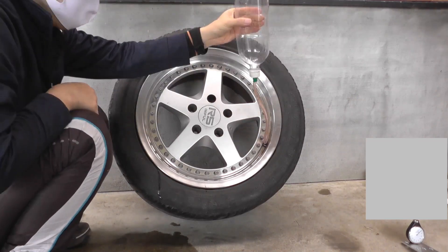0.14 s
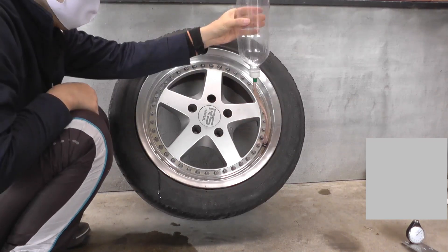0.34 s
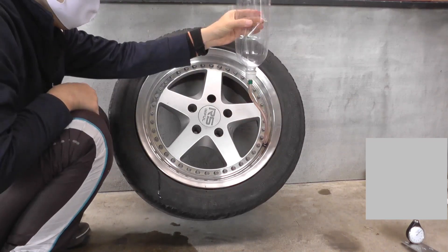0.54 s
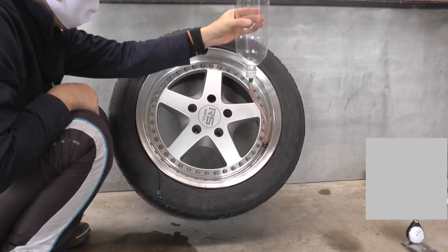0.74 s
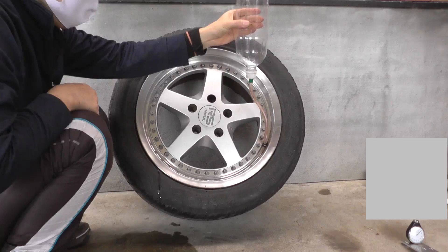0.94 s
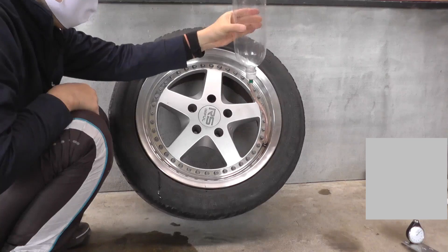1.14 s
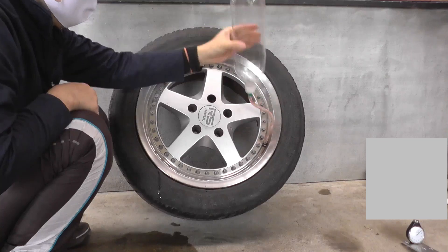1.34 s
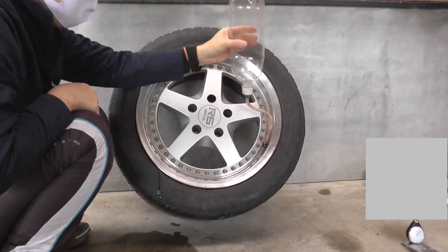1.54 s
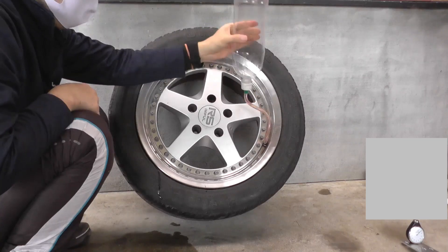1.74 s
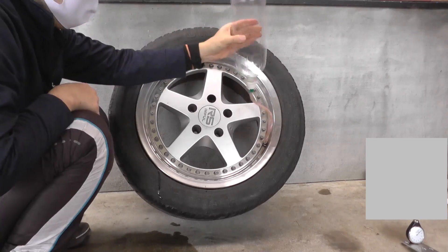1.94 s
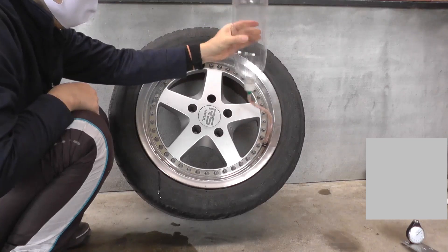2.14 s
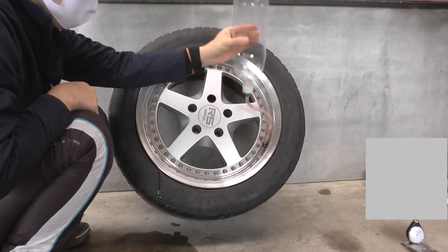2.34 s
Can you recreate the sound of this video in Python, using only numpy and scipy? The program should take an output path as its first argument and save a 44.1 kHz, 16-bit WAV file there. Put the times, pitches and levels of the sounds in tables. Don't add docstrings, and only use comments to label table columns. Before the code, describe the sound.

A thin plastic bottle drains through a hose, its dented wall popping sharply. After a brief silence until 0.14 s, dull gulps lead to a loud snap at 0.27 s and a softer, brighter one at 0.57. Quiet follows, with faint rustles and ticks from 1.15. Hollow gulps and snaps return at 1.55, 1.88 and 2.12, then a weak dull one at 2.33. Short garage echo, distant rumble, faint hiss.

```python
import sys
import numpy as np
from scipy import signal
from scipy.fft import rfft, irfft, next_fast_len
from scipy.io import wavfile
from scipy.ndimage import uniform_filter1d

SR = 44100
rng = np.random.default_rng(int(sys.argv[2]) if len(sys.argv) > 2 else 0)


def unload_audio(sound):
    columns = np.transpose(np.atleast_2d(sound))
    steps = np.round(np.clip(columns, -1, 1) * 32767)
    wavfile.write(sys.argv[1], SR, steps.astype(np.int16))


def gain_from_db(level_db):
    decades = np.asarray(level_db, float) / 20
    return 10 ** decades


N = 105840

# frequency in Hz, level in dB.
RUMBLE_SPECTRUM = [(25, -34), (45, -5), (60, 1), (150, 3), (300, 1.5), (550, -2.5), (1200, -8),
                   (1800, -23.5), (3000, -34.5)]
# frequency in Hz, level in dB.
HISS_SPECTRUM = [(1500, 10.5), (2500, 10), (4000, -14), (7500, -0.5), (11000, -23), (15000, -27),
                 (15500, -55)]
# frequency in Hz, likeness from 0 to 1.
PORT_LIKENESS = [(60, 0.98), (180, 1), (550, 0.95), (1650, 0.9), (4970, 0.87), (15000, 0.83)]
# start in seconds, length in seconds, level in dB,
# tilt in dB per octave.
RUSTLES = [(0.124, 0.036, -60.5, -1.5), (0.201, 0.026, -53, -11), (0.422, 0.082, -63.5, -3),
           (0.737, 0.049, -65.5, 1), (1.154, 0.05, -56, -1.5), (1.248, 0.018, -54, -3),
           (1.307, 0.17, -63.5, -5), (1.386, 0.042, -57.5, 0), (1.428, 0.024, -56, 2),
           (1.507, 0.024, -53.5, -5), (1.587, 0.16, -65, -5), (1.683, 0.091, -58, 0.5),
           (1.817, 0.066, -55.5, -7), (1.904, .13, -57.5, -1.5), (2.056, 0.031, -57, -5.5),
           (2.137, 0.11, -56.5, -2), (2.271, 0.048, -54.5, -4), (2.369, .05, -53.5, -6)]
# frequency in Hz, level in dB.
RUSTLE_SPECTRUM = [(1500, 1), (3000, 2.5), (5000, 3.5), (7500, 9), (10500, 3), (13000, -2.5), (15500, -40),
                   (16000, -30)]
# start in seconds, peak in dB, tilt in dB per octave.
HOSE_TICKS = [(0.2178, -39.5, -8), (0.231, -38.5, -2), (0.3894, -48.5, -3), (0.554, -47.5, -5),
              (1.2488, -40.5, -6), (1.304, -37.5, -1), (1.385, -46, -5), (1.4087, -51, 3), (1.542, -46, 5),
              (1.865, -39, -2), (1.838, -47, -2), (1.871, -39, 3), (2.076, -46, -2), (2.103, -34.5, -1),
              (2.289, -49, -3), (2.3078, -39, -9), (2.3092, -40.5, 5), (2.326, -39, -6), (2.3844, -43, -3)]
# frequency in Hz, level in dB.
TICK_SPECTRUM = [(1500, -19), (3000, -14), (4500, -12), (6100, -5), (8000, -3), (11000, -13.5),
                 (15500, -23)]
# start in seconds, peak in dB, pitch in Hz, life in cycles,
# thump in dB.
BOTTLE_GULPS = [(0.23, -19, 744, 0.86, -4), (0.234, -14, 430, 1.94, -14), (0.2556, -5.5, 625, 1.35, -14.5),
                (0.4893, -15.5, 875, 2, -28), (0.494, -23, 498, 2.3, -30), (.555, -15.5, 620, 1, -13),
                (1.409, -26, 465, 4.3, -17), (1.409, -28, 850, 4.2, -23), (1.517, -28.5, 436, 11.5, 0),
                (1.54, -14, 680, 1.2, -8.5), (1.6958, -21, 1215, 2.5, -15), (1.699, -24.5, 870, 7.6, -40),
                (1.700, -19, 475, 1.96, -9), (1.838, -22.5, 660, 2.5, -3), (1.848, -13, 383, 1.7, -28),
                (1.8611, -17, 720, 3.8, -4.5), (1.916, -31, 880, 2.1, -28), (1.951, -23.5, 850, 3.3, -12),
                (2.0745, -26.5, 950, 3, -1), (2.075, -29, 520, 2, -1), (2.088, -23.5, 322, 6.2, -10),
                (2.096, -29, 370, 2.4, -20), (2.1005, -7.5, 576, 0.76, -15.5),
                (2.200, -22.5, 780, 3.3, -10), (2.107, -22, 404, 2.7, -20), (2.12, -21, 332, 2.4, -14),
                (1.841, -22.5, 285, 2.7, -18), (1.863, -17.5, 400, 2.8, -33), (1.882, -18, 281.7, 2, -11),
                (1.555, -21.5, 220, 2.4, -16), (0.27, -23, 232, 3.2, -25), (0.567, -24.5, 248, 4.2, -12)]
# start in seconds, peak in dB, brightness in dB per octave,
# shell level in dB, middle modes in dB.
WALL_SNAPS = [
    (0.268, -1, 0, -1.5, 0),
    (0.5657, -7.5, 0.5, 0.5, 2.5),
    (1.5524, -1.5, 0.16, -2.5, 0),
    (1.8815, -5, 0.4, -2.5, 2),
    (2.119, -6, 0, -2, 1.5),
    (2.3283, -21, -2.8, 1.5, -4),
]
# frequency in Hz, level in dB, decay t60 in seconds.
WALL_MODES = [(455, 5.5, 0.026), (525, -4.5, 0.05), (915, 4, 0.023), (1127, -5.5, 0.05),
              (1612, -15.5, 0.035), (2024, 4.5, 0.012), (2400, -6, 0.028), (3050, -13, 0.019),
              (3484, -9, 0.017), (4120, -9, 0.019), (4750, -15, 0.013), (5820, -24, 0.041)]
# frequency in Hz, width in Hz, level in dB.
SHELL_RESONANCES = [(298.5, 24, -4), (381.2, 9, 6), (430, 70, -15), (530.8, 12.8, 2.5), (700.3, 14.6, -0.5),
                    (850, 34, -5), (982, 31, -3.5), (1120, 51, -4), (1567, 28, -15)]
# frequency in Hz, level in dB.
CRACK_SPECTRUM = [(300, 4), (2300, -1), (4000, -4), (5400, -11), (7000, -7.5), (12500, -23.5), (16000, -30)]
# frequency in Hz, level in dB.
SNAP_WASH = [(150, -14), (450, -5.5), (1100, -13), (2200, -17.5), (4000, -22), (7000, -33.5),
             (12000, -48.5), (16000, -52)]
# start in seconds, peak in dB,
# frequency in Hz, decay t60 in seconds.
OVERTONES = [(0.2684, -23, 4670, 0.014), (0.2684, -40, 6800, 0.011), (0.2684, -16, 2250, 0.035),
             (0.566, -25, 3700, .012), (0.566, -32, 6870, .012), (0.566, -25, 7830, 0.014),
             (1.3035, -40, 6090, .035), (1.304, -50, 8000, .015), (1.408, -49, 13200, .025),
             (1.443, -49, 10500, .035), (1.445, -62, 8000, .1), (1.5527, -9, 1050, .025),
             (1.5527, -14, 2950, 0.01), (1.5527, -18, 6770, 0.014), (1.5527, -22, 6200, 0.018),
             (1.5527, -29, 12800, .008), (1.839, -47, 4000, .015), (1.882, -19, 3480, 0.016),
             (1.882, -22, 8200, 0.011), (1.882, -32, 12450, 0.0089), (0.566, -12.5, 1700, .012),
             (1.455, -54, 2400, 0.089), (2.1194, -13, 3740, 0.013), (2.1194, -23, 8180, 0.012),
             (2.1194, -24, 11930, 0.0097), (2.1194, -16, 970, 0.052), (2.3286, -27.5, 3600, .012),
             (2.3286, -37, 7400, .008), (2.3286, -29, 12400, 0.0095), (2.3286, -35, 13900, 0.0066),
             (2.3286, -23, 920, 0.022)]
# frequency in Hz, t60 in seconds.
GARAGE_DECAY = [(150, 0.15), (500, 0.49), (1500, 0.29), (4000, 0.3), (8000, 0.22), (14000, 0.37)]
# frequency in Hz, level in dB.
GARAGE_SPECTRUM = [(100, -3), (500, -2.5), (1200, -0.5), (2000, 1), (5000, -5.5), (9000, 5), (15000, -9.5)]
# frequency in Hz, level in dB.
SIDE_SPECTRUM = [(100, -27.5), (400, -24), (1000, -15), (1500, -15.5), (3000, -25), (6000, -20),
                 (12000, -10)]
# frequency in Hz, width in Hz, depth in dB.
HOUSING_DIPS = [(5610, 560, -4), (9290, 650, -8.5)]

THUMP_HZ = 116
SNAP_ATTACK_S = 0.0006
BRIGHT_LAG_S = 0.000705


def along(points, hz):
    f, v = np.transpose(points)
    return np.interp(np.log(hz + 1), np.log(f + 1), v)


def unit(x):
    return x / np.sqrt(np.mean(x ** 2) + 1e-20)


def coloured(x, points):
    n = x.shape[-1]
    m = next_fast_len(n + 4096)
    gain = gain_from_db(along(points, np.fft.rfftfreq(m, 1 / SR)))
    return irfft(rfft(x, m) * gain, m)[..., :n]


def tilted(points, tilt_db, pivot_hz):
    return [(hz, db + tilt_db * np.log2(hz / pivot_hz)) for hz, db in points]


def soft_start(t, attack_s):
    return 1 - np.exp(-(t / attack_s) ** 2)


def gain_patches(shape, bins, frames):
    field = uniform_filter1d(rng.standard_normal(shape), size=bins, axis=0)
    return unit(uniform_filter1d(field, size=frames, axis=1))


def add(track, s, sound):
    part = track[..., round(s * SR):][..., :sound.shape[-1]]
    part += sound[..., :part.shape[-1]]


def brief(x):
    feed_s = 0.0019
    return x * np.exp(-np.arange(len(x)) / SR / feed_s)


def garage(x):
    width = 0.31
    hz, t, z = signal.stft(rng.standard_normal((2, SR // 2)), SR, nperseg=256)
    t60 = along(GARAGE_DECAY, hz)[:, None]
    z = z * gain_from_db(along(GARAGE_SPECTRUM, hz)[:, None] - 60 * t / t60)
    mid, side = signal.istft(z, SR, nperseg=256)[1]
    tail = np.array([mid + width * side, mid - width * side]) / np.linalg.norm(mid)
    return signal.fftconvolve(np.pad(x, (220, 0))[None], tail, axes=1)


def placed(track, s, x, feed):
    side = coloured(np.pad(x, (8, 0))[:len(x)], SIDE_SPECTRUM)
    add(track, s, np.array([x - side, x + side]))
    add(track, s, garage(feed))


def rush(spectrum, patchy_db):
    z = signal.stft(rng.standard_normal((2, N)), nperseg=512)[2]
    likeness = along(PORT_LIKENESS, np.fft.rfftfreq(512, 1 / SR))
    turn = np.arccos(np.clip(likeness, -1, 1))[:, None] / 2
    patches = gain_from_db(patchy_db * gain_patches(z.shape[1:], bins=6, frames=8))
    z = z * patches * np.array([np.cos(turn), np.sin(turn)])
    closed = [(spectrum[0][0] / 2, -60)] + list(spectrum)
    mid, side = coloured(signal.istft(z, nperseg=512)[1][:, :N], closed)
    return unit(np.array([mid + side, mid - side]))


def background():
    hum = gain_from_db(-54) * np.sin(2 * np.pi * 51.2 * np.arange(N) / SR)
    rumble = gain_from_db(-46.5) * rush(RUMBLE_SPECTRUM, patchy_db=0.4)
    hiss = gain_from_db(-67) * rush(HISS_SPECTRUM, patchy_db=3.0)
    return hum + rumble + hiss


def patchy(x, depth_db):
    z = signal.stft(x, nperseg=256)[2]
    z = z * gain_from_db(depth_db * gain_patches(z.shape[1:], bins=4, frames=6))
    return signal.istft(z, nperseg=256)[1][:, :x.shape[1]]


def rustles():
    edge_s, grain_db, patch_db = 0.024, 1, 3.5
    t = np.arange(SR // 4) / SR
    track = np.zeros((2, N))
    for s, length, db, tilt_db in RUSTLES:
        edge = np.clip(t / edge_s, 0, 1) * np.exp(-np.maximum(t - length, 0) / edge_s)
        mid, side, size = rng.standard_normal((3, len(t)))
        grain = gain_from_db(grain_db * unit(uniform_filter1d(size, size=90)))
        rub = grain * np.array([mid + 0.093 * side, mid - 0.19 * side])
        colour = [(100, -80)] + tilted(RUSTLE_SPECTRUM, tilt_db, 7000)
        add(track, s, gain_from_db(db) * edge * unit(coloured(patchy(rub, patch_db), colour)))
    return track


def ticks(t):
    t60_s, attack_s, level_db, room_db = 0.031, 0.0016, -2, -7
    track = np.zeros((2, N))
    for s, db, tilt_db in HOSE_TICKS:
        noise = unit(coloured(rng.standard_normal(len(t)), tilted(TICK_SPECTRUM, tilt_db, 7000)))
        x = gain_from_db(db + level_db - 60 * t / t60_s) * (1 - np.exp(-t / attack_s)) * noise
        placed(track, s, x, gain_from_db(room_db) * x)
    return track


def thump(t, cycles):
    return np.sin(2 * np.pi * THUMP_HZ * t) * np.exp(-t * THUMP_HZ / cycles)


def tremble(t, tilt_db):
    hold_s, t60_s, attack_s = 0.028, 0.2, 0.00043
    f = np.fft.rfftfreq(len(t), 1 / SR)
    body = 0
    for k, (hz, width, db) in enumerate(SHELL_RESONANCES):
        level = (-1) ** k * gain_from_db(db + tilt_db * np.log2(hz / 500))
        body = body + level * 1j * f * width / (hz * hz - f * f + 1j * f * width)
    body = body / (1 + (f / 1500) ** 4)
    noise = unit(irfft(rfft(rng.standard_normal(len(t))) * body, len(t)))
    return noise * gain_from_db(-60 * np.maximum(t - hold_s, 0) / t60_s) * (1 - np.exp(-t / attack_s))


def gulps(t):
    attack_turns, shell_db, room_db = 0.55, -27.5, -4
    track = np.zeros((2, N))
    for s, db, hz, life, thump_db in BOTTLE_GULPS:
        turns = hz * t
        note = np.sin(2 * np.pi * turns) * np.exp(-turns / life) * soft_start(turns, attack_turns)
        push = gain_from_db(thump_db) * thump(t, cycles=0.83) * soft_start(t, 1 / (THUMP_HZ * 10))
        x = note + gain_from_db(shell_db) * tremble(t, tilt_db=0.5) + push
        placed(track, s, gain_from_db(db) * x, gain_from_db(db + room_db) * brief(x))
    return track


def wall_ring(t, tilt_db, middle_db):
    hz, db, t60 = np.transpose(WALL_MODES)[..., None]
    level_chance, phase_chance = rng.standard_normal((2, len(WALL_MODES), 1))
    octave = np.log2(hz / 1000)
    u = np.maximum(t - BRIGHT_LAG_S * (octave > 0.5), 0)
    colour_db = tilt_db * octave + middle_db * np.exp(-2 * octave ** 2)
    level = gain_from_db(db + colour_db + level_chance - 60 * u / t60)
    wave = np.sin(2 * np.pi * hz * u + 0.67 * phase_chance)
    return -(level * soft_start(u, SNAP_ATTACK_S) * wave).sum(axis=0)


def crack(t, bright_db):
    level_db, t60_s = -10.5, 0.014
    late = np.maximum(t - BRIGHT_LAG_S, 0)
    noise = unit(coloured(rng.standard_normal(len(t)), CRACK_SPECTRUM))
    return gain_from_db(level_db + 2 * bright_db - 60 * late / t60_s) * soft_start(late, SNAP_ATTACK_S) * noise


def snaps(t):
    air_hz, air_db, air_t60_s = 371.4, -21.5, 0.24
    thump_db, tremble_db, wall_db, wash_db = -26, -20.5, -7.5, 2.5
    track = np.zeros((2, N))
    for s, db, bright_db, shell_db, middle_db in WALL_SNAPS:
        air = gain_from_db(air_db - 60 * t / air_t60_s) * np.sin(2 * np.pi * air_hz * t)
        shell = gain_from_db(tremble_db) * tremble(t, tilt_db=middle_db / 2)
        body = gain_from_db(thump_db) * thump(t, cycles=0.68) + gain_from_db(shell_db) * (air + shell)
        x = body * soft_start(t, SNAP_ATTACK_S) + crack(t, bright_db)
        x = x + gain_from_db(wall_db) * wall_ring(t, bright_db, middle_db)
        wash = coloured(signal.unit_impulse(256, 128), tilted(SNAP_WASH, bright_db, 500))
        placed(track, s, gain_from_db(db) * x, gain_from_db(db + wash_db) * 10 * wash)
    return track


def pings(t):
    attack_s, room_db, roughness = 0.00087, -5.5, 0.75
    track = np.zeros((2, N))
    for s, db, hz, t60 in OVERTONES:
        drift = roughness * np.cumsum(rng.standard_normal(len(t))) / 10
        tone = np.sin(2 * np.pi * hz * t + drift)
        x = gain_from_db(db - 60 * t / t60) * soft_start(t, attack_s) * tone
        placed(track, s, x, gain_from_db(room_db) * brief(x))
    return track


def scene():
    t = np.arange(SR // 3) / SR
    handling = rustles() + ticks(t[:SR // 20])
    bottle = gulps(t) + snaps(t) + pings(t[:SR // 10])
    return background() + handling + bottle


def top_cut(x):
    return signal.sosfilt(signal.butter(12, 16640, fs=SR, output="sos"), x)


def record(dry):
    low_cut_hz, top_hz, ceiling, start_s = 52, 15900, 0.8, 0.1428
    m = next_fast_len(N + SR // 4)
    f = np.fft.rfftfreq(m, 1 / SR)
    dips = gain_from_db(sum(db * np.exp(-((f - hz) / width) ** 2) for hz, width, db in HOUSING_DIPS))
    low_cut = (1j * f / (low_cut_hz + 1j * f)) ** 2
    x = irfft(rfft(dry, m) * dips * low_cut * (f < top_hz), m)[:, :N]
    x = x / (1 + np.abs(x / ceiling) ** 4) ** 0.25
    return top_cut(x * (np.arange(N) > start_s * SR))


dry = scene()
out = record(dry)
unload_audio(out)
```